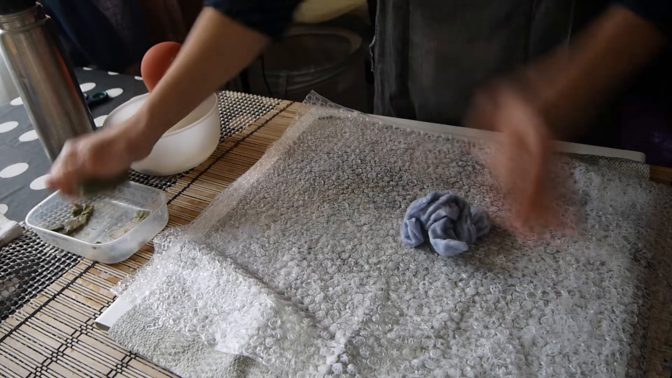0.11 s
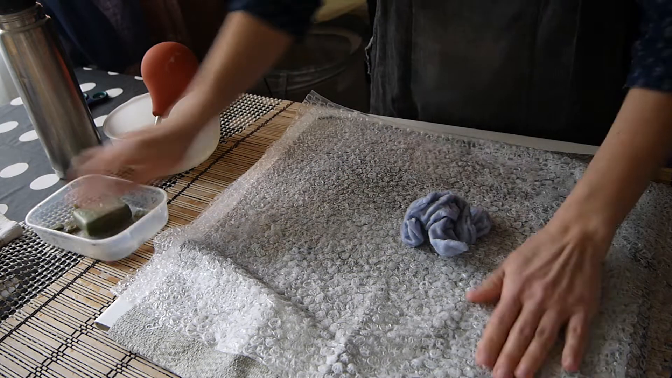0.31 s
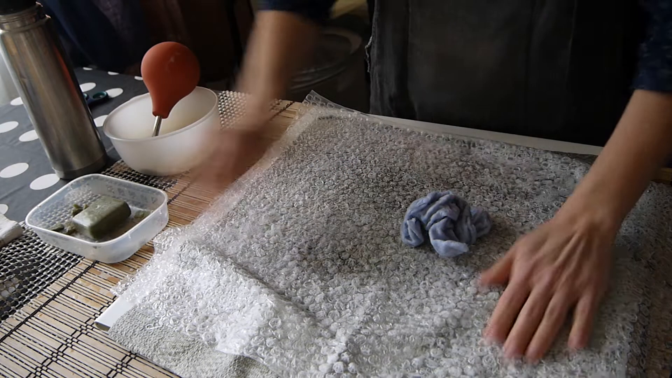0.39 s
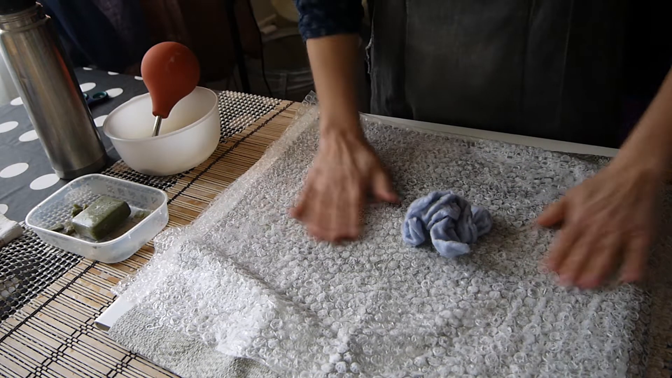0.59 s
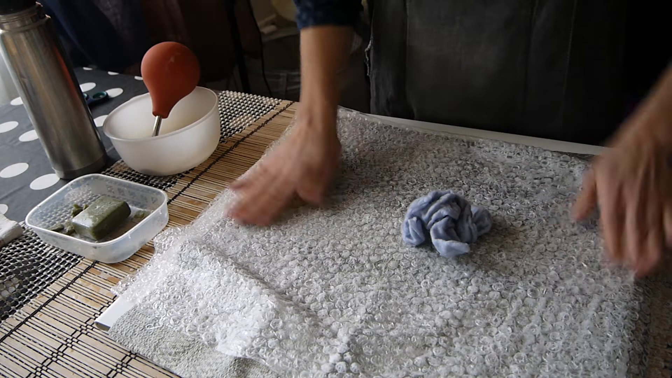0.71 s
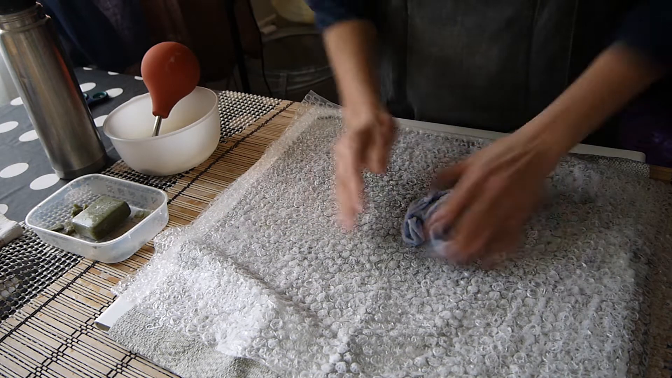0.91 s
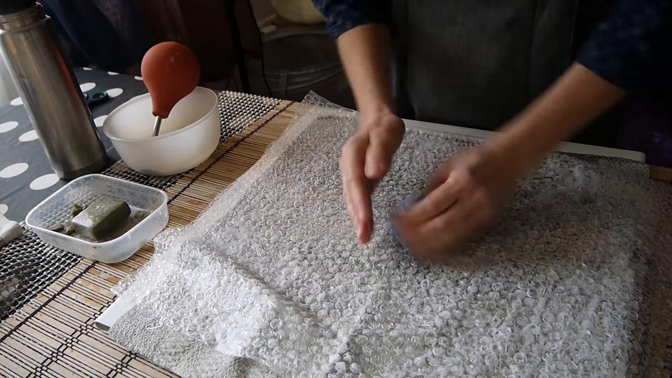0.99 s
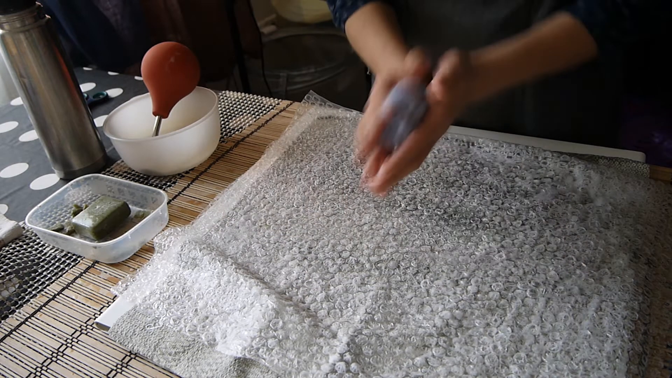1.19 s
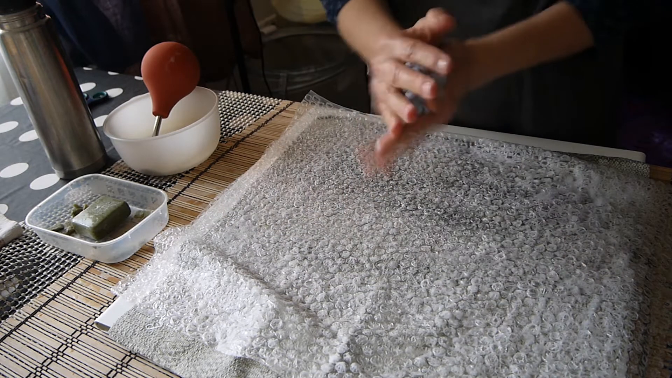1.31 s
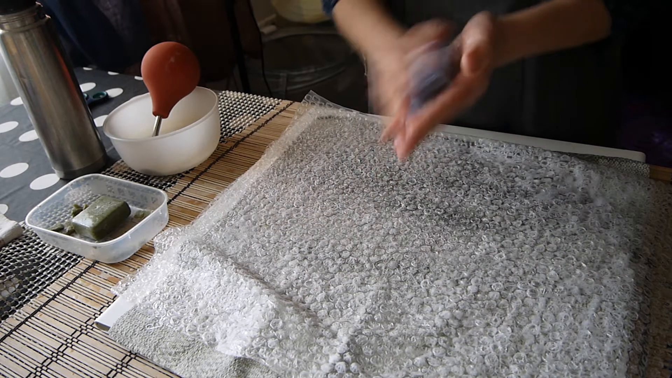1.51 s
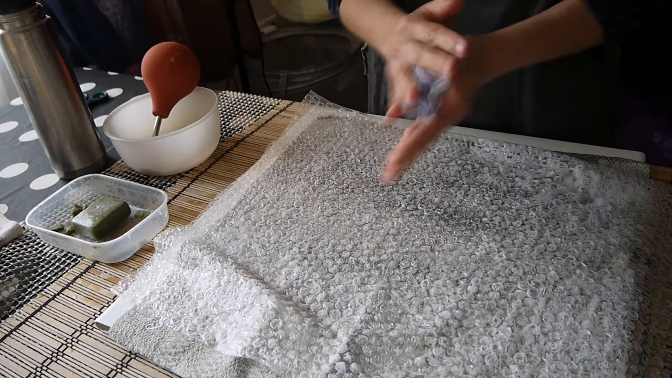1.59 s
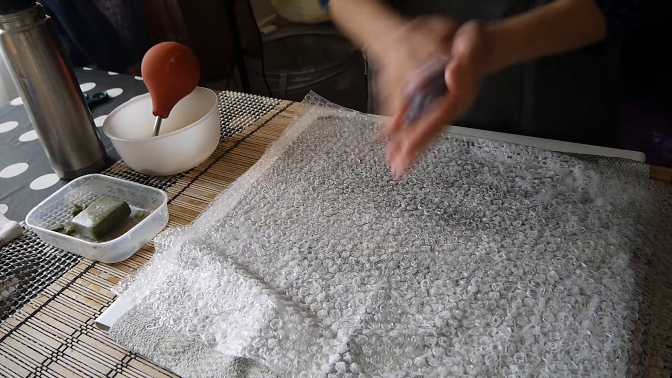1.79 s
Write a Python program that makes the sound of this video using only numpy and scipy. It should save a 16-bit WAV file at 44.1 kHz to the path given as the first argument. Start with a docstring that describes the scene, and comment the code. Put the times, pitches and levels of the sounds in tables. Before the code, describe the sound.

A bar of soap dropped into a plastic tub, left of centre: quiet room air, a hard hollow crack at 0.25 s, duller knocks at 0.34 s, a lighter clack and wet ticks around 0.41-0.44 s with a short skid. Low muffled palm thuds and a soft wipe over bubble wrap at 0.6-0.8 s, a faint scoop near 1 s, then barely audible wool rubbing with tiny lather squelches from 1.3 s.

```python
"""A quiet small room first, then a bar of soap drops into a plastic tub left of centre, tumbles and skids to rest.
Wet hands land on bubble wrap, wipe across it, scoop up a soapy lump of wool and roll it between the palms.
Tub and table are struck resonators; cracks, ticks and lather are short noise; rubbing is a dense rain of tiny slips.
The soap's knocks, cracks, ticks and thuds excite a diffuse room; air noise lies under everything."""
import sys
import numpy as np
from scipy import signal
from scipy.fft import rfft, irfft
from scipy.io import wavfile

SR = 44100
rng = np.random.default_rng(int(sys.argv[2]) if len(sys.argv) > 2 else 0)


def digitize_waveform(pressure):
    """Quantize a signal to 16-bit integers and store it at the path in sys.argv[1].

    Rows of a 2-D input are taken as channels; values are limited to [-1, 1].
    """
    field = np.atleast_2d(pressure).T
    bounded = np.clip(field, -1, 1)
    quanta = np.round(bounded * 32767).astype(np.int16)
    wavfile.write(sys.argv[1], SR, quanta)


N = 79380
TIME = np.arange(N) / SR

# soap strikes the tub: start_s, ring_db, centre_hz of the favoured modes, crack_db, thud_db
SOAP_KNOCKS = [(0.2451, -18.5, 1570, -6.5, -29), (0.251, -28.5, 1710, -29, -22),
               (0.3406, -19.5, 950, -21, -31.5), (.3429, -23.5, 960, -19, -30.5),
               (0.3453, -20, 940, -18, -28), (0.4073, -32.5, 1660, -35, -34.5),
               (0.4147, -22.5, 2100, -17, -44.5)]
# wet ticks of the soap: start_s, level_db
SOAP_TICKS = [(.194, -52), (.2511, -24), (.2601, -28), (.3462, -26.5), (.4238, -29), (.4345, -24),
              (.4437, -31.5)]
# modes of the tub walls: pitch_hz, level_db, t60_s
TUB_MODES = [(730, -9, .05), (886, 0, .065), (1020, -12, .05), (1120, 0, .06), (1360, -1, .06),
             (1500, -10, .05), (1640, -6, .045), (1813, -7, .05), (1935, -3, .04), (2080, -4, .035),
             (2300, -4, .025), (3280, -6, .018), (4065, -2, .018), (4950, 2, .014)]
# crack of soap on plastic: pitch_hz, relative level_db
CRACK_SPECTRUM = [(300, -13), (1000, 1.5), (2300, 10), (3200, -6.5), (5500, -1), (7500, -6.5),
                  (11000, -12.5), (16000, -63)]
# wet tick: pitch_hz, relative level_db
TICK_SPECTRUM = [(1000, -8), (4000, 3), (8500, -4), (12000, 1), (16000, -34)]
# thud of the tub's base: pitch_hz, relative level_db
THUD_SPECTRUM = [(60, -24), (110, -11), (190, 5.5), (280, -0.5), (350, 3.5), (480, 4.5), (580, -11),
                 (750, -6), (1200, -16), (3000, -39.5)]
# soap skidding to rest: time_s, level_db
SKID_CURVE = [(.355, -37), (.375, -29.5), (.40, -37), (.425, -21), (.44, -28.5), (.475, -29.5), (.50, -39),
              (.62, -61), (.7, -100)]
# skidding soap: pitch_hz, relative level_db
SKID_SPECTRUM = [(100, -9), (200, -22), (450, -3.5), (600, -9), (1200, 3.5), (2000, 2.5), (3000, -4),
                 (5000, -13), (6700, -22), (9000, -9), (12000, -24.5), (16000, -50)]
# modes of the table: pitch_hz, level_db, t60_s
TABLE_MODES = [(107.6, -11, 0.33), (167, -7, 0.19), (227, -3.5, 0.028), (347.2, -5.5, 0.21),
               (395, -15.5, 0.065)]
# hands press on the table: start_s, level_db, contact_brightness_hz
HAND_PRESSES = [(0.603, -37, 500), (.617, -32.5, 200), (.655, -30.5, 132), (0.714, -38.5, 503),
                (0.98, -41, 700), (1, -46, 200)]
# table rumbling under the palms: time_s, level_db
DRAG_CURVE = [(.58, -75), (.61, -42), (.66, -43.5), (.72, -42.5), (.78, -52), (.83, -60), (.9, -96)]
# table rumble: pitch_hz, relative level_db
DRAG_SPECTRUM = [(40, -23), (70, -19), (88, 5), (106, 9), (125, -8.5), (170, -3), (290, -11.5), (360, -5),
                 (450, -3.5), (900, -59)]
# palms wiping over the wrap: time_s, level_db
WIPE_CURVE = [(.50, -65), (.57, -46.5), (.612, -42), (.645, -43), (.718, -38.5), (.75, -42), (.78, -49.5),
              (.84, -63.5), (.9, -92.5)]
# wiped wrap: pitch_hz, relative level_db
WIPE_SPECTRUM = [(200, -9), (370, 0.5), (550, -1), (830, 2.5), (1400, -2.5), (2500, 0), (5000, -2),
                 (7000, -5.5), (10500, -6), (13000, -18.5), (16000, -39)]
# fingers scooping up the wool: time_s, level_db
SCOOP_CURVE = [(.968, -75), (.977, -51), (.981, -47), (1.006, -49), (1.046, -52.5), (1.053, -47),
               (1.075, -57), (1.14, -69), (1.2, -98)]
# scooped wool: pitch_hz, relative level_db
SCOOP_SPECTRUM = [(60, -14), (170, 9.5), (250, -18), (350, 6.5), (600, -13), (850, -3), (1400, -16),
                  (2800, -13), (5000, -9), (7000, -15), (10500, -14), (16000, -45)]
# wool rolling between the palms: time_s, level_db
ROLL_CURVE = [(1.03, -91), (1.10, -62.5), (1.23, -63.5), (1.29, -56.5), (1.38, -53.5), (1.5, -55.5),
              (1.6, -55), (1.64, -55.5), (1.72, -54.5), (1.8, -56)]
# rolled wool: pitch_hz, relative level_db
ROLL_SPECTRUM = [(100, -39), (330, 8.5), (600, -12), (1100, -7), (1800, -8), (3500, -10.5), (5000, -5.5),
                 (7000, -8), (10500, -5.5), (13000, -17.5), (16000, -34)]
# lather squelching as the palms turn: peak_s, level_db
LATHER_SQUELCHES = [(1.335, -74), (1.41, -57), (1.595, -54.5), (1.665, -57.5), (1.725, -59)]
# squelch: pitch_hz, relative level_db
SQUELCH_SPECTRUM = [(150, -1), (500, -6), (1100, 0.5), (2000, -10.5), (3500, -13), (12000, -28)]
# the room's tail: pitch_hz, relative level_db, t60_s, left_right_likeness (0 to 1)
ROOM_TAIL = [(98, 2.5, 0.39, 0.97), (348, 3, 0.51, 0.99), (700, 4.5, 0.35, 1), (1620, 3, 0.5, .65),
             (4500, 0, 0.72, 0.67), (9800, 0, 0.35, 0.18)]
# room air: pitch_hz, relative level_db
AIR_SPECTRUM = [(25, 1.5), (40, 11), (64, -10), (110, -7), (180, 0), (330, -2), (500, -2), (800, -4.5),
                (1500, -10.5), (3200, -18), (5000, -18), (10000, -22), (13000, -28), (16000, -38)]
# room air: pitch_hz, left_right_likeness (0 to 1)
AIR_STEREO = [(30, 0.46), (90, 0.62), (300, 0.45), (1000, 0.18), (4000, 0.13), (12000, 0.37)]

TUB_PAN_DB, TUB_WIDTH_DB = 6, -12  # left over right; side part of cracks and ticks
STRIKE_FOCUS_DB = 5.5  # loss of a mode one octave from the centre of the strike
MODE_STAGGER_S = 0.00031  # modes start at random up to this far apart, softening the onset
CRACK_T60_S, TICK_T60_S, THUD_T60_S = 0.016, 0.019, 0.057
TABLE_SHAKE_DB = -3  # blow on the table relative to the thud
MUFFLE_HZ = 880
GRAINS_PER_S, HANDS_LIKENESS = 6000, 0.62
SQUELCH_SWELL_S = 0.015
ROOM_DB, ROOM_DELAY_S, ROOM_BUILD_S = -5, 0.0046, 0.0072
AIR_DB = -53.5
LOW_CUT_HZ, CUTOFF_HZ = 70, 15700


def soap():
    """The bar makes the tub walls ring and crack, the base thud and shake the table; its wet underside ticks."""
    lags = MODE_STAGGER_S * rng.random(len(TUB_MODES))
    walls = sum(strike(s, db, hz, lags) for s, db, hz, _, _ in SOAP_KNOCKS)

    crack_events = [(s, db) for s, _, _, db, _ in SOAP_KNOCKS]
    crack = colour(rng.standard_normal((2, N)), CRACK_SPECTRUM) * bursts(crack_events, CRACK_T60_S)
    ticks = colour(rng.standard_normal((2, N)), TICK_SPECTRUM) * bursts(SOAP_TICKS, TICK_T60_S)

    landings = [(s, db) for s, _, _, _, db in SOAP_KNOCKS]
    base = colour(rng.standard_normal(N), THUD_SPECTRUM) * bursts(landings, THUD_T60_S)
    shake = sum(blow(s, db + TABLE_SHAKE_DB, soft_hz=600) for s, db in landings)
    thud = base + table(shake)

    # one noise channel is the panned middle, the other the stereo side
    snap, spread = crack + ticks
    side = from_db(TUB_WIDTH_DB) * spread * [[1], [-1]]
    direct = (walls + snap) * pan(TUB_PAN_DB) + side + thud
    skid = friction(SKID_CURVE, SKID_SPECTRUM, grain_db=3.5) * pan(db=4)
    return direct + room(walls + snap + thud) + skid


def strike(s, db, centre_hz, lags):
    """Each place on the tub favours the modes near one pitch; staggered starts soften the onset."""
    out = 0
    for (hz, mode_db, t60), lag in zip(TUB_MODES, lags):
        loss = STRIKE_FOCUS_DB * np.log2(hz / centre_hz) ** 2
        force = blow(s + lag, db - loss, soft_hz=9000)
        out = out + ring(force, [(hz, mode_db, t60)])
    softness = signal.butter(2, min(3.3 * centre_hz, SR / 4), fs=SR, output="sos")
    return signal.sosfilt(softness, out)


def hands():
    """Palms press on the table and wipe the wrap, then pick up the wool and roll it."""
    thuds = table(sum(blow(*press) for press in HAND_PRESSES))
    rumble = level(DRAG_CURVE) * colour(rng.standard_normal(N), DRAG_SPECTRUM)
    wipe = friction(WIPE_CURVE, WIPE_SPECTRUM, grain_db=0.0)
    scoop = friction(SCOOP_CURVE, SCOOP_SPECTRUM, grain_db=0.5)
    roll = friction(ROLL_CURVE, ROLL_SPECTRUM, grain_db=-1.0)
    return thuds + rumble + wipe + scoop + roll + squelches()


def friction(curve, spectrum, grain_db):
    """A rubbed surface: dense tiny random slips of uneven size, under a level curve."""
    sizes_db = grain_db * np.minimum(rng.exponential(1, (2, N)), 4)
    sizes = from_db(sizes_db) * rng.choice([-1, 1], (2, N))
    slips = sizes * (rng.random((2, N)) < GRAINS_PER_S / SR)
    return level(curve) * stereo(colour(slips, spectrum), HANDS_LIKENESS)


def squelches():
    """Short bell-shaped swells of wet noise from the lather."""
    swell = sum(from_db(db) * np.exp(-0.5 * ((TIME - s) / SQUELCH_SWELL_S) ** 2)
                for s, db in LATHER_SQUELCHES)
    wet = colour(rng.standard_normal((2, N)), SQUELCH_SPECTRUM)
    return swell * stereo(wet, HANDS_LIKENESS)


def table(force):
    """The table booms in its modes, muffled by the mat and wrap."""
    muffle = signal.butter(2, MUFFLE_HZ, fs=SR, output="sos")
    return signal.sosfilt(muffle, ring(force, TABLE_MODES))


def room(x):
    """Diffuse reflections that build up, then die away at a rate set octave by octave."""
    tail, hz = 0, np.fft.rfftfreq(N, 1 / SR)
    white = stereo(rfft(rng.standard_normal((2, N))), at_hz(ROOM_TAIL, hz, axis=3))
    for low in 40 * 2 ** np.arange(9):
        centre = low * np.sqrt(2)
        band = irfft(white * ((hz >= low) & (hz < 2 * low)), N)
        decay = bursts([(0.003, at_hz(ROOM_TAIL, centre))], at_hz(ROOM_TAIL, centre, axis=2))
        tail = tail + band * decay
    build_up = np.clip((TIME - ROOM_DELAY_S) / ROOM_BUILD_S, 0, 1)
    tail = rms_one(tail * build_up) / np.sqrt(N)  # unit energy
    return from_db(ROOM_DB) * signal.fftconvolve(tail, x[None], axes=1)[:, :N]


def air():
    """The quiet low rumble and hiss of the room: steady noise, its left-right likeness varying with pitch."""
    noise = rfft(colour(rng.standard_normal((2, N)), AIR_SPECTRUM))
    likeness = at_hz(AIR_STEREO, np.fft.rfftfreq(N, 1 / SR))
    return from_db(AIR_DB) * irfft(stereo(noise, likeness), N)


def blow(s, db, soft_hz):
    """One contact: a click rounded off by its softness."""
    click, r = np.zeros(N), np.exp(-2 * np.pi * soft_hz / SR)
    click[int(s * SR)] = from_db(db)
    return signal.lfilter([1 - r], [1, -r], click + 1e-18)


def ring(force, modes):
    """A body rings in its modes, each a two-pole resonator driven by the force."""
    out = 0
    for hz, db, t60 in modes:
        r, w = from_db(-60 / (t60 * SR)), 2 * np.pi * hz / SR  # decay and turn per sample
        mode = signal.lfilter([1, -r * np.cos(w)], [1, -2 * r * np.cos(w), r * r], force)
        out = out + from_db(db) * mode
    return out


def bursts(events, t60):
    """Envelope of sudden onsets that die away by 60 dB in t60 seconds."""
    return sum(from_db(db) * (TIME >= s) * np.exp(-np.log(1000) * np.abs(TIME - s) / t60)
               for s, db in events)


def level(points):
    """Gain along a level curve, silent before it starts."""
    return from_db(np.interp(TIME, *np.transpose(points), left=-np.inf))


def colour(x, spectrum):
    """Give a steady noise a spectrum; unit power."""
    gain = from_db(at_hz(spectrum, np.fft.rfftfreq(N, 1 / SR)))
    return rms_one(irfft(rfft(x) * gain, N))


def stereo(pair, likeness):
    """Two unrelated signals, as middle and side, become left and right of a given likeness."""
    c = np.clip(likeness, 0, 0.995)
    middle = np.sqrt((1 + c) / 2) * pair[0]
    side = np.sqrt((1 - c) / 2) * pair[1]
    return middle + side * np.array([[1], [-1]])


def pan(db):
    """Left and right gains for a level difference, positive to the left."""
    return from_db([[db / 2], [-db / 2]])


def at_hz(points, hz, axis=1):
    """Read a column of a table on a log-frequency axis."""
    rows = np.array(points)
    return np.interp(np.log(np.maximum(hz, 1)), np.log(rows[:, 0]), rows[:, axis])


def rms_one(x):
    """Scale to unit power."""
    return x / np.sqrt(np.mean(x ** 2) + 1e-20)


def from_db(db):
    """Decibels to gain."""
    return 10 ** (np.asarray(db) / 20)


def scene():
    """Soap, hands and room air together."""
    return soap() + hands() + air()


def record(dry):
    """The microphone loses the deep bass and clips just below full scale; the top treble is cut steeply."""
    thin = signal.sosfilt(signal.butter(3, LOW_CUT_HZ, "high", fs=SR, output="sos"), dry)
    clipped = np.clip(thin, -0.87, 0.87)
    treble_cut = signal.ellip(10, 0.1, 80, CUTOFF_HZ, fs=SR, output="sos")
    return signal.sosfilt(treble_cut, clipped)


dry = scene()
out = record(dry)
digitize_waveform(out)
```